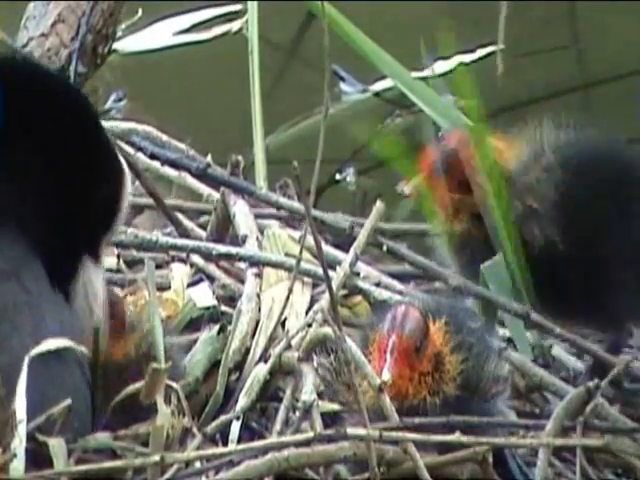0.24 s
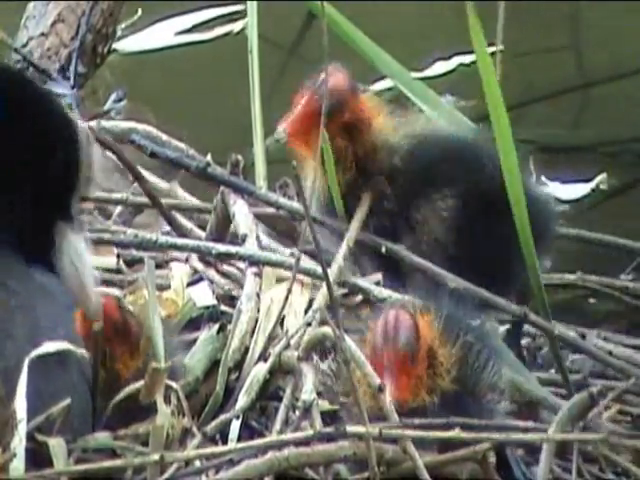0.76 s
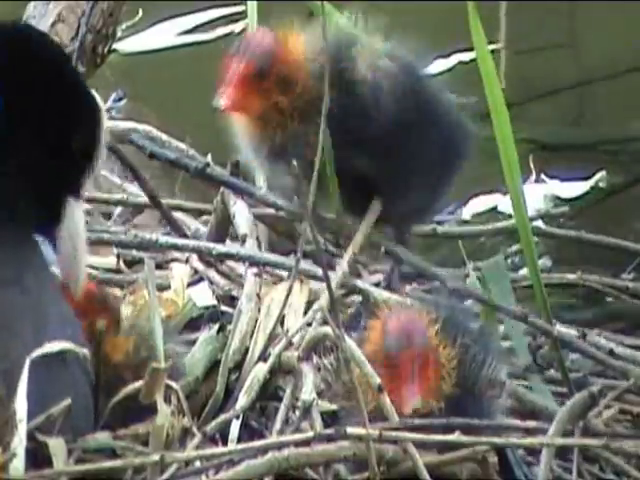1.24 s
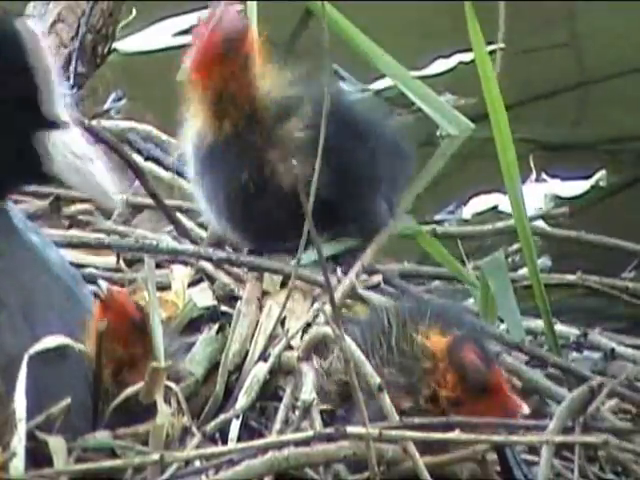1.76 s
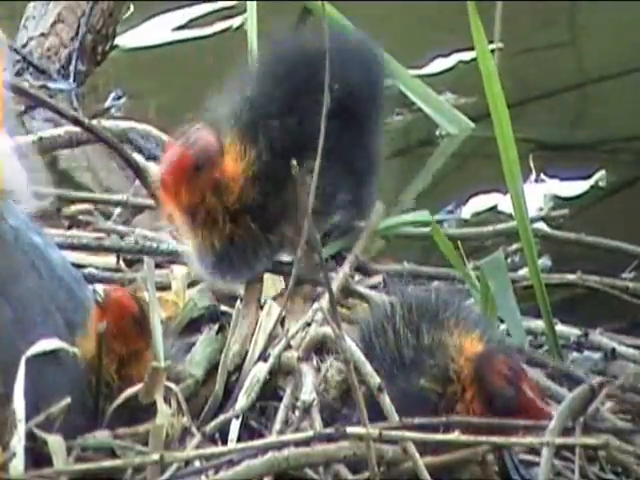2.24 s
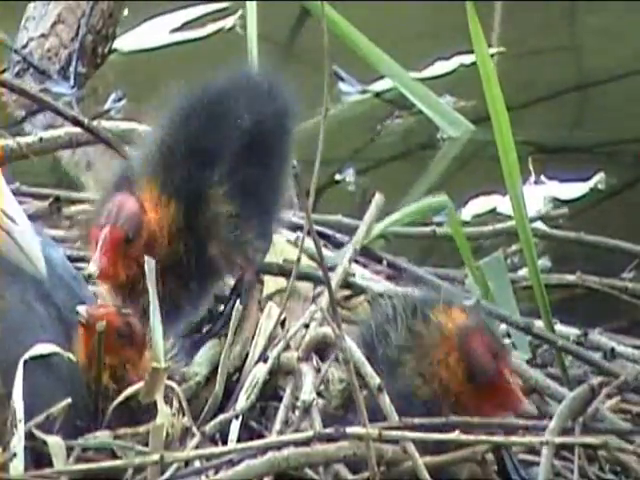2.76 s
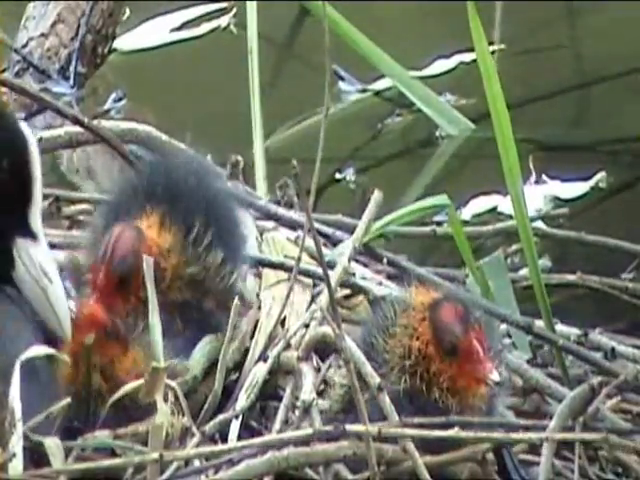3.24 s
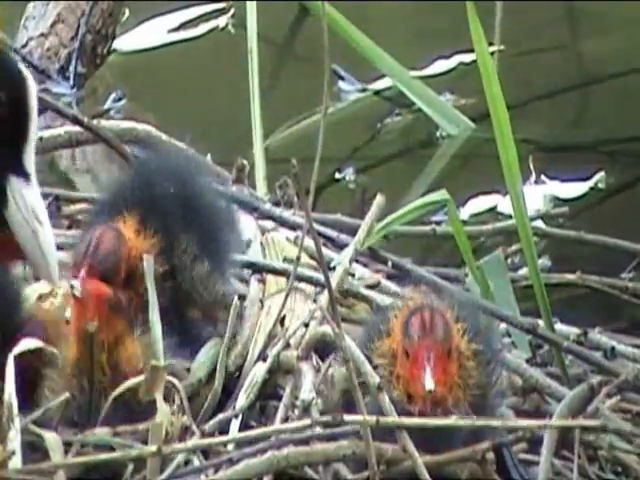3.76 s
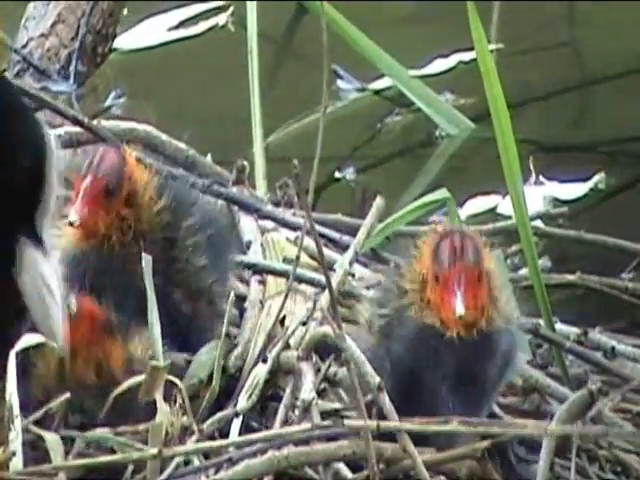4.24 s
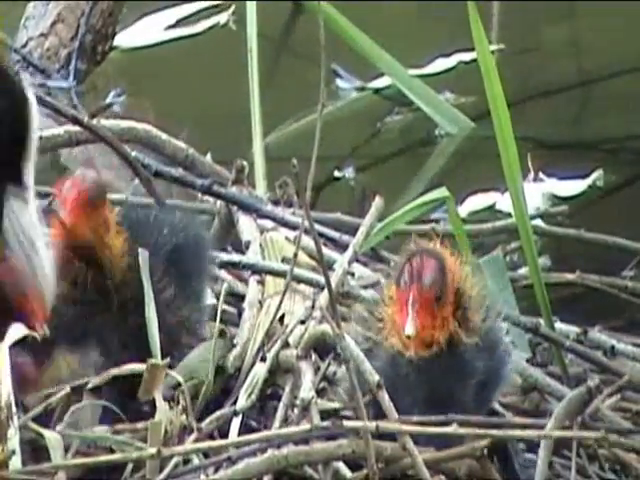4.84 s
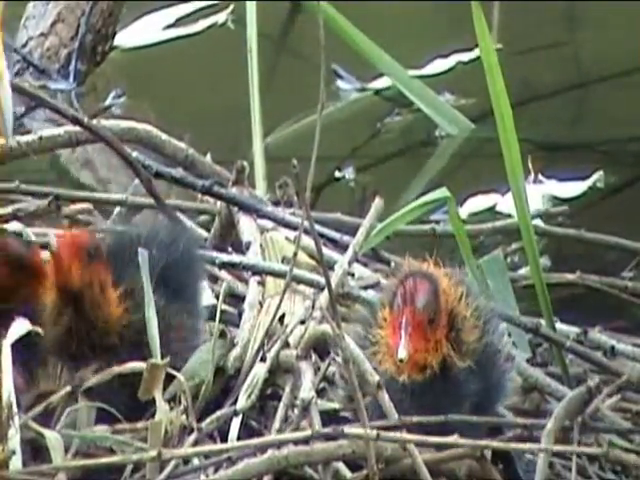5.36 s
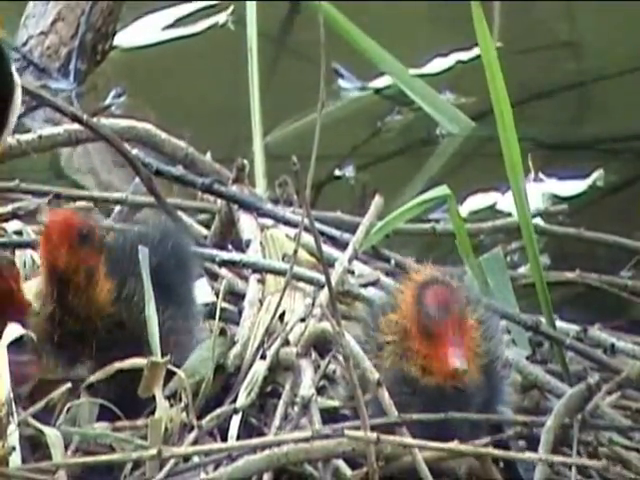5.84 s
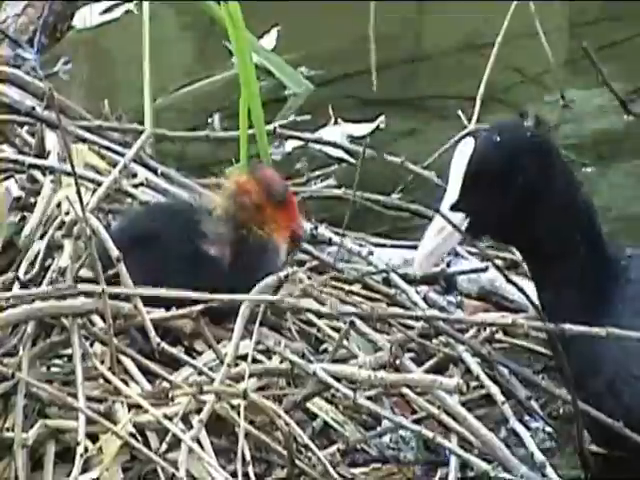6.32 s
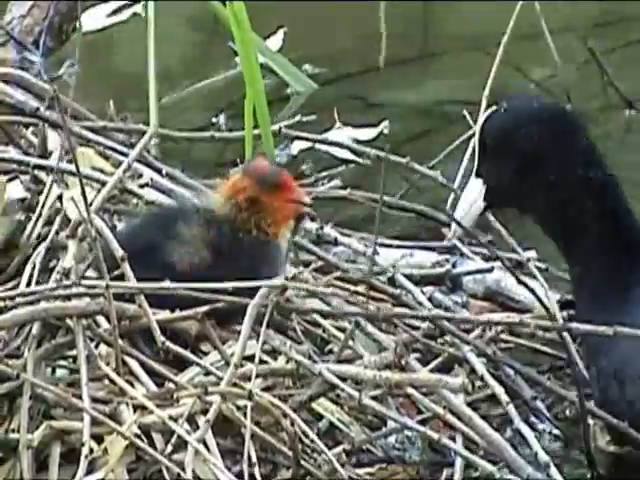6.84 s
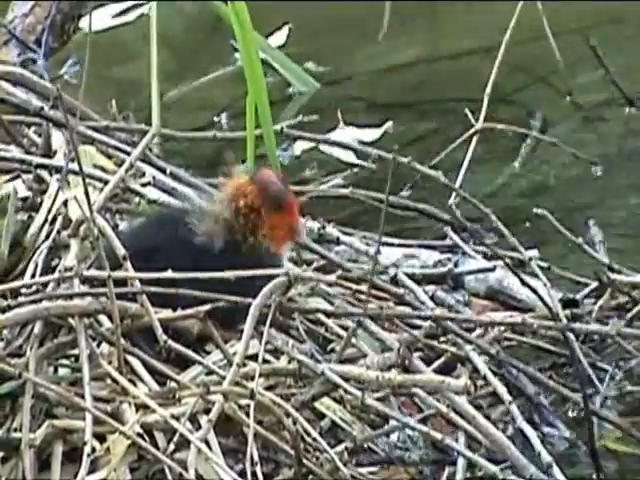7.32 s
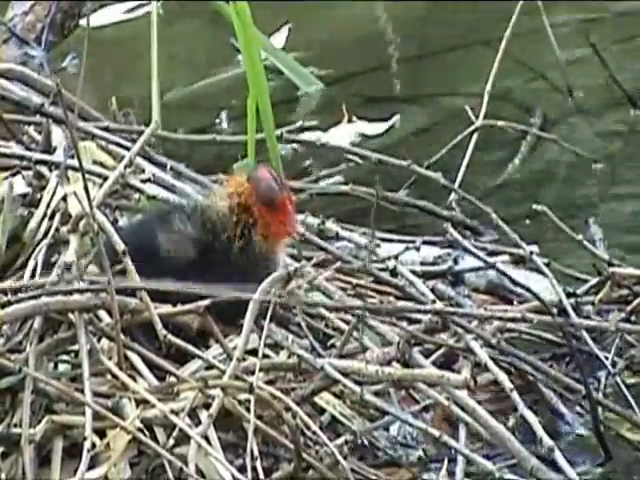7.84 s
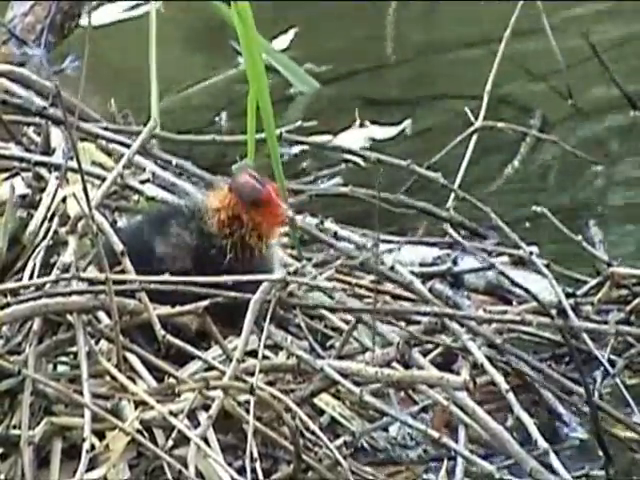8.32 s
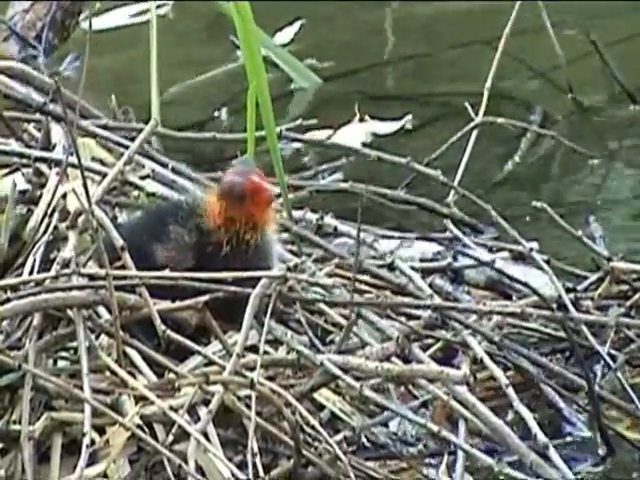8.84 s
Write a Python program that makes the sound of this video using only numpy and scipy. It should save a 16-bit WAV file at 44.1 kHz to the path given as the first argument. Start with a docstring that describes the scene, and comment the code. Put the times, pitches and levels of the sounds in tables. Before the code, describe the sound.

Waterbird chicks call at irregular moments among twigs near water, with many far birds twittering behind. Hoarse falling calls come first, then small chirps, a quieter gap, and four strong upward peeps about half a second apart. A quick chattering string of chips leads to bright overlapping whistles and a loud wavering final call. Two small camera microphones give slightly gritty, thin treble, faint hiss and low hum, with calls leaning left or right.

```python
"""A hoarse, sinking call comes first, over a soft outdoor wash; then waterbird chicks and songbirds call over a pond bank
with clean and hooked whistles, swinging calls, a trill, a run of two-voiced chips and warbled rising peeps.
Each voice is a near sine on a pitch curve, roughened by noise. Filtered noise makes the air, wind and echoes;
short chips and blurred noise make the far chorus. Twigs tick and a mains hum lies underneath.
Two spaced camcorder microphones hear it all, and a coarse change of sample rate mirrors every loud call."""
import sys
import numpy as np
from scipy import signal
from scipy.fft import rfft, irfft
from scipy.io import wavfile
from scipy.ndimage import uniform_filter1d

SR = 44100
rng = np.random.default_rng(int(sys.argv[2]) if len(sys.argv) > 2 else 0)


def master(y):
    """Save y as 16-bit WAV."""
    cut = np.clip(np.atleast_2d(y).T, -1, 1)
    pcm = np.round(cut * 32767)  # scale
    wavfile.write(sys.argv[1], SR, pcm.astype(np.int16))


N = 400417  # length [samples]

CLEAR_SCATTER = 0.3  # share of a clear, close whistle that reaches the trees
RASP_BASE_HZ = 597.6  # scaled by hoarseness to give the rate of the roughness
WARBLE_START_HZ, WARBLE_RISE = 68.04, 0.483  # the rise is the share by which the warble quickens to the end


def undb(db):
    """Turn decibels into an amplitude factor."""
    return 10 ** (np.asarray(db) / 20)


def level(x, db):
    """Set the RMS level of a sound."""
    return x * undb(db) / np.sqrt(np.mean(x ** 2))


def band(x, lo_hz, hi_hz, order=2):
    """Keep one band of frequencies."""
    return signal.sosfilt(signal.butter(order, [lo_hz, hi_hz], "bandpass", fs=SR, output="sos"), x)


def walk(rate, count=N):
    """Random levels held 1 / rate s and slewed twice; spread near 1."""
    hold = max(int(SR / rate), 1)
    steps = np.repeat(rng.standard_normal(count // hold + 1), hold)
    smooth = uniform_filter1d(uniform_filter1d(steps, hold), hold)
    return 1.373 * smooth[:count]


def curve(table):
    """Draw straight lines between timed points over the whole scene."""
    return np.interp(np.arange(N) / SR, *np.transpose(table))


def add(out, start_s, x, pan_db):
    """Mix a sound in at its place between left and right; pan is left minus right."""
    i = int(start_s * SR)
    x = x[max(-i, 0):N - i]
    sides = undb(np.array([[pan_db], [-pan_db]]) / 2)
    out[:, max(i, 0):max(i, 0) + len(x)] += x * sides


def whistle(table, hoarse, fade_s=0.006, warble_hz=0., glide_s=0.013):
    """A near sine on the pitch curve; a hoarse syrinx spreads it into a noisy band, a warble swings the pitch."""
    s, hz, db = np.transpose(table)
    t = np.arange(s[0] - fade_s, s[-1] + fade_s, 1 / SR)
    count = len(t)

    # the warble widens after the start and quickens, unsteadily, to the end
    along = (t - t[0]) / (t[-1] - t[0])
    warble_rate = WARBLE_START_HZ * (1 + WARBLE_RISE * along ** 2 + 0.186 * walk(58.2, count=count))
    beat = 2 * np.pi * np.cumsum(warble_rate) / SR
    warble = warble_hz * np.minimum(4 * along, 1) * np.sin(beat)

    pitch = uniform_filter1d(np.interp(t, s, hz), int(glide_s * SR)) + warble
    phase = 2 * np.pi * np.cumsum(pitch + 12 * walk(60, count=count)) / SR  # a little pitch jitter

    rasp_rate = RASP_BASE_HZ * (0.4 + hoarse + 2 * hoarse ** 8)
    rasp = walk(rasp_rate, count=count) + 1j * walk(rasp_rate, count=count)
    tone = np.imag((1 - hoarse + hoarse * rasp) * np.exp(1j * phase))

    unsteady = level(tone * undb(2.8 * walk(44.6, count=count)), 0)
    to_edge = np.minimum(t - t[0], t[-1] - t)
    edge = np.sin(np.pi / 2 * np.clip(to_edge / (2 * fade_s), 0, 1)) ** 2
    return t, unsteady * edge * undb(np.interp(t, s, db))


def air():
    """Distant outdoor wash and microphone hiss that flicker a little, with a mains hum and three wavering drones."""
    # colour of the wash, set to one overall level below: (frequency [Hz], relative density [dB per Hz])
    wash_colour = [(18, -8.5), (30, -12.5), (194, -20.5), (280, -24.5), (355, -20), (415, -27), (962, -23),
                   (2410, -22.5), (4080, -23.5), (6050, -33.5), (14800, -48)]
    # hum and drones: (frequency [Hz], waver [Hz], level [dB], left minus right [dB])
    drones = [(29.3, 2.97, -53, -12), (99.2, 1.6, -60.5, 12), (154, 6.52, -68.5, 7),
              (345, 4.52, -69.5, 3.5)]
    wash_db, flicker_db = -46.5, 1.3
    f = np.fft.rfftfreq(N, 1 / SR)[1:]
    hz, db = np.transpose(wash_colour)
    gain = np.r_[0, undb(np.interp(np.log(f), np.log(hz), db))]
    wash = irfft(rfft(rng.standard_normal((2, N))) * gain, N)
    lean_db = np.array([[1.2], [-1.2]])  # left, right
    out = level(wash, wash_db) * undb(lean_db + flicker_db * walk(6))
    for hz, waver_hz, db, pan_db in drones:
        phase = 2 * np.pi * np.cumsum(hz + waver_hz / 2 * walk(8)) / SR
        loudness = undb(db + 0.69 * waver_hz * walk(5.2))
        add(out, 0, loudness * np.sqrt(2) * np.sin(phase), pan_db)
    return out


def wind():
    """Slow gusts push each membrane on its own, felt more than heard."""
    wind_db = -37
    push = level(band(rng.standard_normal((2, N)), 6.15, 19.6), 0)
    return push * undb(wind_db + 0.65 * walk(1))


def far_chorus(count=1200):
    """Many distant birds: short hoarse chips at chance moments, over their blurred echoes."""
    # swell of the chorus: (time [s], gain [dB])
    chorus_swell = [(0, -41.5), (.8, -41), (1.2, -42.5), (1.8, -41.5), (2.6, -47.5), (4.1, -45.5),
                    (5.2, -42.5), (6., -47), (6.55, -43), (7.1, -47), (7.35, -36.5), (8.2, -50.5),
                    (9.08, -39)]
    chips_far = np.zeros((2, N))
    for when, pitch, glide, length, loud, side in rng.random((count, 6)):
        hz, s = 3100 + 1600 * pitch, when * N / SR
        table = [(s, hz, 0), (s + 0.0043 + 0.018 * length, hz + 1700 * (glide - 0.6), 0)]
        t, x = whistle(table, 0.31, fade_s=0.0032, glide_s=0.011)
        add(chips_far, t[0], x * undb(-12 * loud), 6 + 8 * (side - 0.5))
    flicker = undb(3.5 * walk(16))
    lean = undb(np.array([[2.5], [-2.5]]))  # left, right
    blur = band(rng.standard_normal((2, N)), 2420, 4670, order=3) * flicker * lean
    return (level(chips_far, -7.5) + level(blur, -5.5)) * undb(curve(chorus_swell))


def twigs():
    """Dry ticks of a millisecond or two, each a decaying burst of noise."""
    # twigs that tick: (time [s], starting level [dB], left minus right [dB])
    ticks = [(5.901, -35.5, -2), (8.494, -32.5, 17)]
    out = np.zeros((2, N))
    t = np.arange(int(0.02 * SR)) / SR
    for s, db, pan_db in ticks:
        add(out, s, undb(db) * rng.standard_normal(len(t)) * np.exp(-t / 0.0019), pan_db)
    return out


def trees(x):
    """Trunks and banks scatter the calls back as a short diffuse tail, unrelated left and right."""
    t60_s, gain_db = 0.7, 14.5
    t = np.arange(int(0.6 * SR)) / SR
    tail = rng.standard_normal((2, len(t))) * undb(-60 * t / t60_s) * np.clip(t / 0.0035, 0, 1)
    tail = np.diff(tail, 2, axis=1)  # leaves scatter the treble best
    tail /= np.sqrt(np.sum(tail ** 2, axis=1, keepdims=True))
    return undb(gain_db) * signal.fftconvolve(x, tail, axes=1)[:, :N]


def bank(near):
    """The far bank throws the near calls back once, blurred, on the left."""
    echo_s, echo_db, pan_db, smear_s = 0.134, -30.5, 24, 0.0051
    out = np.zeros((2, N))
    t = np.arange(int(0.06 * SR)) / SR
    smear = rng.standard_normal(len(t)) * np.exp(-t / smear_s)
    blur = band(smear, 2420, 4560)  # foliage throws back mostly the treble
    blur *= undb(echo_db) / np.sqrt(np.sum(blur ** 2))
    add(out, echo_s, signal.fftconvolve(near.mean(axis=0), blur), pan_db)
    return out


def twitters():
    """Faint quick twitters further off: falling whistles a few milliseconds long."""
    # twitters: (time [s], level [dB])
    twitter_times = [(2.045, -66), (2.163, -35), (2.169, -47), (2.192, -38)]
    length_s, from_hz, to_hz = 0.0032, 4800, 3870
    out = np.zeros((2, N))
    for s, db in twitter_times:
        table = [(s, from_hz, db), (s + length_s, to_hz, db)]
        t, x = whistle(table, 0.32, fade_s=0.002, glide_s=0.0015)
        add(out, t[0], x, 0)
    return out


def trill():
    """A clear, sinking whistle chopped into rapid pulses."""
    # pitch curve of the trill: (time [s], pitch [Hz], level [dB])
    trill_glide = [(2.96, 5020, -52), (3.2, 4630, -58.5)]
    rate_hz, pan_db = 69, 18.5
    out = np.zeros((2, N))
    t, x = whistle(trill_glide, 0.037)
    pulses = 2 * np.cos(np.pi * rate_hz * (t - 2.988)) ** 4  # one pulse peaks at 2.988 s
    add(out, t[0], x * pulses, pan_db)
    return out


def chips():
    """A run of chips, each two falling voices at once, slightly apart in time."""
    # chips: (time [s], upper voice level [dB])
    chip_times = [(6.2927, -26), (6.348, -31), (6.4086, -34), (6.4647, -36), (6.5232, -33.5),
                  (6.5846, -34.5), (6.6446, -31.5), (6.7133, -37), (6.783, -39), (6.8515, -34.5)]
    # upper, then lower voice: (delay [s], end after the chip's time and delay [s], from [Hz], to [Hz],
    # left minus right [dB])
    voices = [(0., 0.0214, 3520, 3220, -1), (.004, 0.01, 2547, 2180, -8.5)]
    lower_db = -35.5
    out = np.zeros((2, N))
    for s, upper_db in chip_times:
        for db, (late, length, from_hz, to_hz, pan_db) in zip((upper_db, lower_db), voices):
            table = [(s + late + 0.002216, from_hz, db), (s + late + length, to_hz, db)]
            t, x = whistle(table, 0.32, fade_s=0.0027)
            add(out, t[0], x, pan_db)
    return out


def swinging_calls():
    """Calls whose pitch swings up and down as a cosine, loudest in the middle."""
    # swings: (start [s], length [s], time of a pitch top [s], middle [Hz], swing [Hz], period [s], level [dB],
    # hoarseness [0-1], left minus right [dB])
    swings = [(0.847, 0.11, 0.903, 2260, 184, 0.029, -31, 0.41, -7),
              (8.548, 0.097, 8.59, 3407, 414, 0.048, -33.5, 0.53, 8.5),
              (8.87, 0.2, 8.92, 2847, 472, .113, -20.5, 0.3, -5)]
    edge_drop_db = 6.5
    out = np.zeros((2, N))
    for start, length, top, mid_hz, swing_hz, period, db, hoarse, pan_db in swings:
        s = start + np.arange(0, length, 1 / 500)
        hz = mid_hz + swing_hz * np.cos(2 * np.pi * (s - top) / period)
        swell_db = db - edge_drop_db * (2 * (s - start) / length - 1) ** 2
        t, x = whistle(np.c_[s, hz, swell_db], hoarse, glide_s=0.0049)
        add(out, t[0], x, pan_db)
    return out


def hooked_whistles():
    """An upward flick settles exponentially into a held note that climbs slowly."""
    # hooks: (start [s], held note [Hz], its level [dB], flick over held note [dB], left minus right [dB])
    hooks = [(7.781, 2844, -25.5, 8, -6), (7.908, 2795, -27.5, -19, 9.5), (8.064, 2734, -22.5, 0.5, -4),
             (8.2, 2750, -28.5, -13, -7)]
    length_s, settle_s, drop_hz, climb_hz_per_s, hoarse = 0.156, 0.01122, 789, 317, 0.31
    out = np.zeros((2, N))
    since = np.arange(0, length_s, 1 / 500)
    flick = np.exp(-since / settle_s)
    for s, held_hz, db, flick_db, pan_db in hooks:
        hz = held_hz - drop_hz * flick + climb_hz_per_s * since
        table = np.c_[s + since, hz, db + flick_db * flick]
        t, x = whistle(table, hoarse, fade_s=0.0035, glide_s=0.0043)
        add(out, t[0], x, pan_db)
    return out


def turning_calls():
    """Whistles that swell to a turn in pitch and fade after it; hoarser ones reach the trees more fully."""
    # calls: (start [s], time to the loudest turn [s], time from there to the end [s], from [Hz], turn [Hz],
    # end [Hz], level [dB], hoarseness [0-1], left minus right [dB])
    calls = [ (0.0, 0.063, 0.08, 2800, 2750, 2200, -31.5, 0.71, -8.5),
             (0.252, 0.1, 0.031, 2870, 2746, 2140, -31, 0.66, -16.5),
             (0.49, 0.089, 0.044, 2137, 2133, 2030, -33.5, 0.12, -4),
             (0.689, 0.042, 0.057, 2100, 1806, 1650, -37.5, 0.29, -2),
             (0.77, 0.042, 0.05, 2966, 2930, 2880, -24.5, 0.63, 5),
             (0.8, 0.034, 0.029, 3100, 4140, 3620, -36.5, 0.24, 5),
             (0.95, 0.067, 0.027, 2960, 2820, 2810, -23.5, 0.48, 5.5),
             (1.13, 0.012, 0.26, 5200, 5080, 5280, -49, 0.27, 13.5),
             (1.165, 0.23, 0.035, 1780, 2050, 2030, -41.5, 0.16, -25),
             (1.41, 0.06, 0.068, 2090, 2510, 2430, -33, 0.24, -11),
             (1.66, 0.1, 0.035, 2876, 2930, 2610, -28, 0.45, 6.5),
             (1.682, 0.24, 0.025, 1747, 2610, 2870, -32, 0.22, -4),
             (1.744, 0.016, 0.039, 3150, 3610, 4800, -38, 0.5, 10),
             (1.78, 0.028, 0.04, 4216, 3386, 2880, -31, 0.92, 3.5),
             (1.929, 0.029, 0.043, 2750, 2743, 2120, -29.5, 0.57, -6.5),
             (2.651, 0.023, 0.044, 3900, 4380, 2605, -39.5, 0.5, 13),
             (2.734, 0.03, 0.029, 2700, 3313, 3765, -31.5, 0.27, 7),
             (3.218, 0.027, 0.011, 3900, 4270, 4640, -34.5, 0.9, 7),
             (3.244, 0.017, 0.02, 3250, 3335, 2975, -28.5, 0.51, 7.5),
             (3.443, 0.018, 0.0078, 4300, 3610, 3450, -35, 0.3, 11),
             (3.484, 0.0083, 0.015, 3150, 3850, 2940, -36.5, 0.2, 13),
             (3.605, 0.013, 0.024, 2910, 3500, 3780, -37, 0.32, 10),
             (4.468, 0.048, 0.017, 2794, 3255, 3810, -32.5, 0.5, 8),
             (4.791, 0.087, 0.045, 2966, 2890, 2934, -30, 0.28, 7.5),
             (5.231, 0.02, 0.039, 3436, 2920, 2400, -29.5, 0.5, -4),
             (5.32, 0.067, 0.021, 2330, 2320, 2210, -28.5, 0.23, -8.5),
             (5.281, 0.016, 0.046, 3550, 3200, 2680, -31, 0.3, 5),
             (5.37, 0.026, 0.024, 2750, 3523, 3400, -30, 0.52, 6),
             (5.68, 0.013, 0.043, 3500, 3170, 2310, -31, 0.47, -6),
             (5.765, 0.062, 0.028, 2340, 2310, 2387, -30.5, 0.1, -10.5),
             (5.73, 0.022, 0.011, 3600, 2940, 2560, -31.5, 0.48, 7),
             (6.077, 0.0086, 0.0078, 2230, 2430, 2830, -34, 0.27, -9.5),
             (6.097, 0.026, 0.035, 4200, 3753, 1910, -31.5, 0.5, 4),
             (6.15, 0.0076, 0.037, 3023, 2860, 2590, -21.5, 0.58, -2.5),
             (6.14, 0.045, 0.057, 3500, 4034, 3390, -32, 0.74, 5.5),
             (6.241, 0.033, 0.037, 2360, 2332, 2310, -28, 0, -7.5),
             (7.177, 0.024, 0.052, 3800, 4470, 3120, -39, 0.63, 12),
             (7.22, 0.033, 0.027, 2200, 3040, 2670, -30, 0.73, -9.5),
             (7.275, 0.049, 0.035, 2650, 4540, 3654, -33, 0.3, 17),
             (7.328, 0.033, 0.049, 2900, 4590, 3205, -28, 0.41, 8.5),
             (7.371, 0.022, 0.019, 2700, 2960, 2830, -33, 0.3, -8),
             (7.44, 0.047, 0.12, 2900, 3326, 3504, -19, 0.12, -0.5),
             (7.459, 0.089, 0.08, 1720, 1945, 1890, -46, 0.15, -5),
             (7.5, 0.0337, 0.068, 3500, 3850, 3674, -31.5, 0.1, 0),
             (7.55, 0.05, 0.067, 2913, 3007, 2656, -26, 0.24, -8),
             (7.62, 0.028, 0.081, 3390, 3384, 3360, -35, 0, 0),
             (7.68, 0.076, 0.14, 1880, 2036, 1886, -39, 0.18, -0.5),
             (8.03, 0.043, 0.22, 2080, 2278, 2238, -27, 0.05, -7),
             (8.02, 0.031, 0.044, 3900, 3440, 3150, -36.5, 0.96, 2),
             (8.302, 0.27, 0.052, 2050, 1700, 1540, -46, 0.24, -10),
             (8.642, 0.0157, 0.071, 1575, 1870, 1866, -27.5, 0.28, -1),
             (8.764, 0.014, 0.16, 3437, 3420, 3200, -37, 0.13, 5),
             (8.769, 0.077, 0.019, 2560, 2480, 2440, -30, 0.14, -4),
             (8.886, 0.034, 0.07, 1964, 1930, 1855, -30.5, 0.28, -3.5), ]
    swell_db, fade_db = 7, 10  # shared out by the length of each side of the turn
    out, afar = np.zeros((2, 2, N))
    for s, rise, fall, from_hz, turn_hz, end_hz, db, hoarse, pan_db in calls:
        share = rise / (rise + fall)
        table = [(s, from_hz, db - swell_db * share),
                 (s + rise, turn_hz, db),
                 (s + rise + fall, end_hz, db - fade_db * (1 - share))]
        t, x = whistle(table, hoarse, warble_hz=850 * hoarse ** 2 * (1 - hoarse))
        add(out, t[0], x, pan_db)
        add(afar, t[0], x * min(CLEAR_SCATTER + 4 * hoarse, 1), pan_db)
    return out, afar


def near_birds():
    """Gather the bird voices other than peeps and far chorus, and the share of them that reaches the trees."""
    turning, turning_afar = turning_calls()
    clear = hooked_whistles() + trill()
    full_scatter = swinging_calls() + chips() + twitters()
    near = turning + clear + full_scatter
    afar = turning_afar + CLEAR_SCATTER * clear + full_scatter
    return near, afar


def peeps():
    """Warbled peeps, hoarse whistles whose rise steepens to the end."""
    # rising peeps: (start [s], length [s], from [Hz], top [Hz], curl of the rise [1 = straight], level [dB],
    # loudest moment [share of the length])
    rises = [(4.112, 0.135, 1762, 4245, 1.6, -24.5, 0.67), (4.539, 0.14, 1840, 3724, 1.01, -17, 0.55),
             (4.939, .13, 1748, 3913, 1.2, -18.5, 0.64), (5.344, 0.13, 2080, 4035, 2.0, -17.5, 0.56)]
    warble_depth_hz, hoarse, pan_db = 187, 0.324, -4.5
    swell_db, fade_db = 19.5, 9.5
    out = np.zeros((2, N))
    share = np.arange(21) / 20
    for s, length, from_hz, top_hz, curl, db, loudest in rises:
        shape_db = np.interp(share, [0, loudest, 1], [-swell_db, 0, -fade_db])
        hz = from_hz + (top_hz - from_hz) * share ** curl
        t, x = whistle(np.c_[s + length * share, hz, db + shape_db], hoarse, warble_hz=warble_depth_hz)
        add(out, t[0], x, pan_db)
    return out


def scene():
    """Birds, echoes and ticks reach two spaced microphones, over the air and wind."""
    right_late_s, right_turn_rad = 0.00032, 2.6
    loud = peeps()
    near, afar = near_birds()
    others = loud + bank(loud + afar) + far_chorus()
    heard = near + others + trees(afar + others) + twigs()
    # the birds sit nearer the left microphone; the right one also turns the phase
    f = np.fft.rfftfreq(N, 1 / SR)
    turn = np.exp(1j * (right_turn_rad - 2 * np.pi * f * right_late_s))
    heard[1] = irfft(rfft(heard[1]) * turn, N)
    return heard + air() + wind()


def record(dry):
    """The rate change takes the nearest camera sample: a sawtooth timing error that mirrors each tone every 3.9 kHz."""
    camera_rate, top_hz = 48000, 15800
    camera = signal.resample_poly(dry, 160, 147, axis=1)  # 44100 to 48000 Hz
    nearest = np.round(np.arange(N) * camera_rate / SR).astype(int)
    nearest = np.minimum(nearest, camera.shape[1] - 1)
    lowpass = signal.ellip(10, 0.2, 80, top_hz, fs=SR, output="sos")
    return signal.sosfilt(lowpass, camera[:, nearest])


dry = scene()
out = record(dry)
master(out)
```